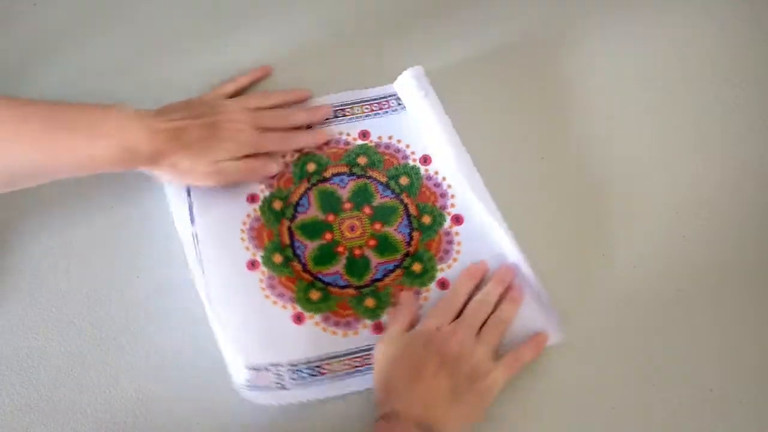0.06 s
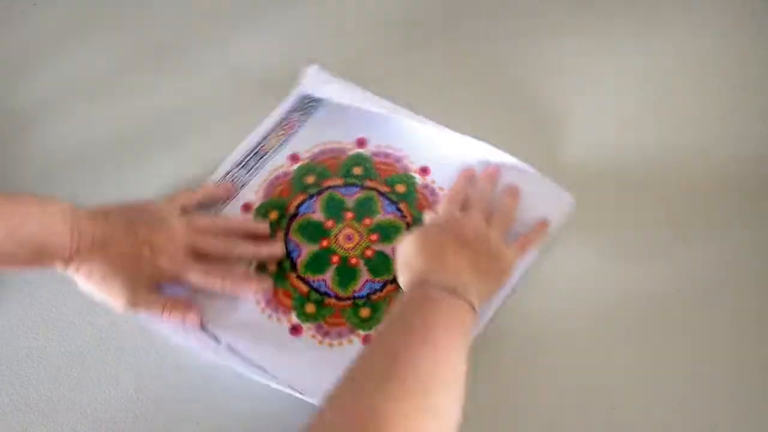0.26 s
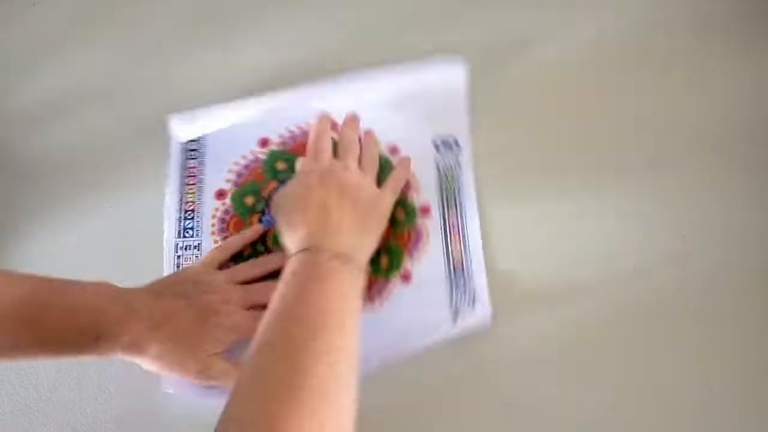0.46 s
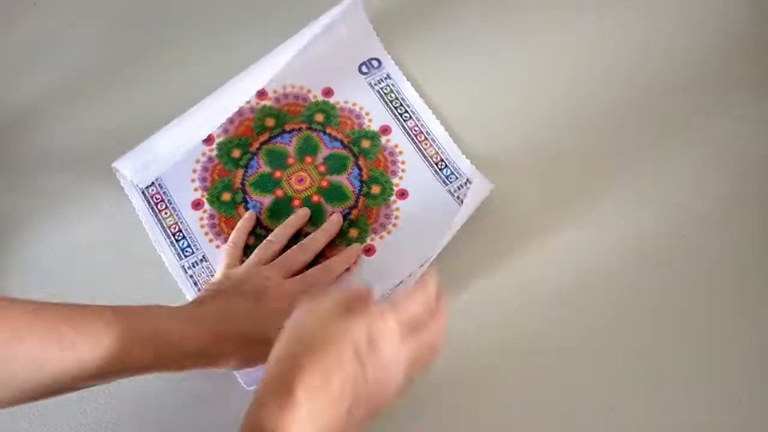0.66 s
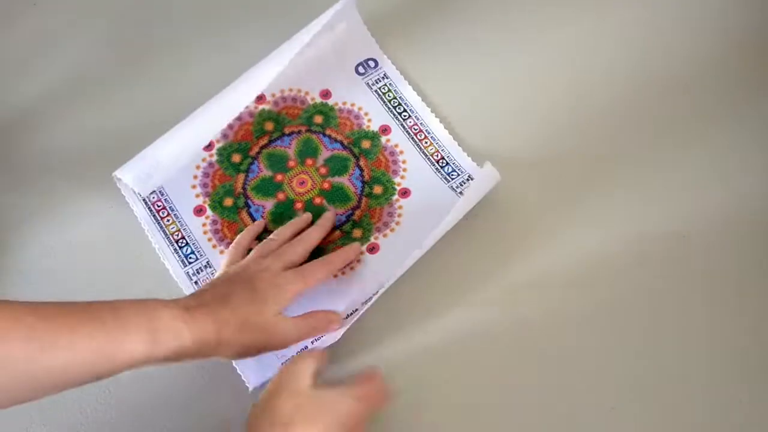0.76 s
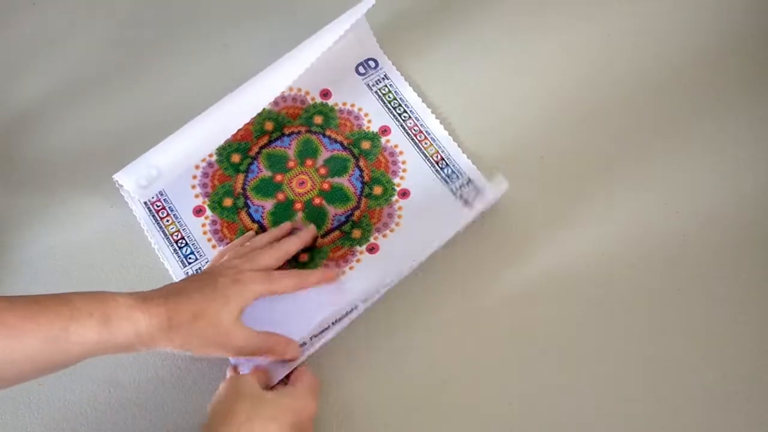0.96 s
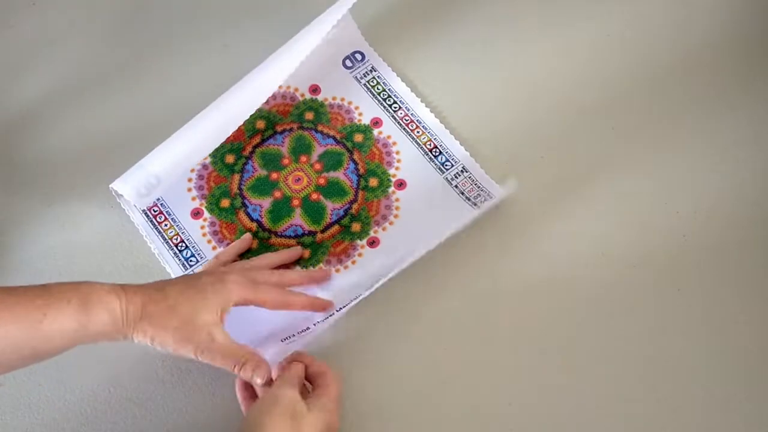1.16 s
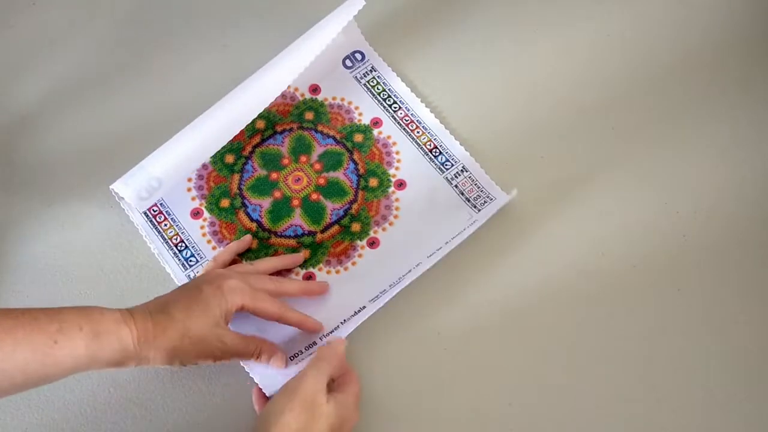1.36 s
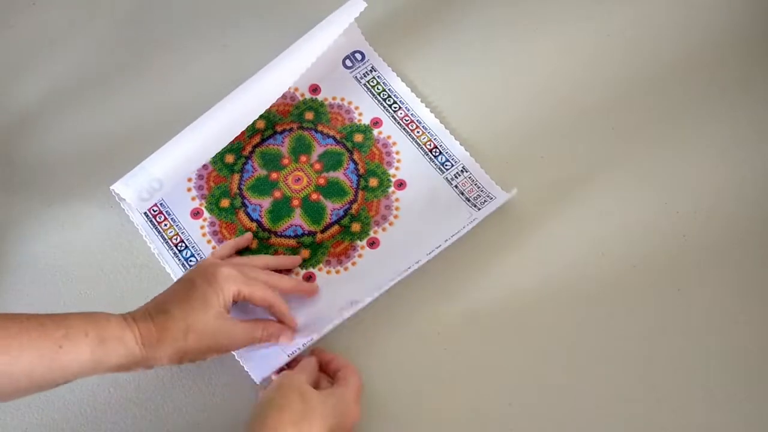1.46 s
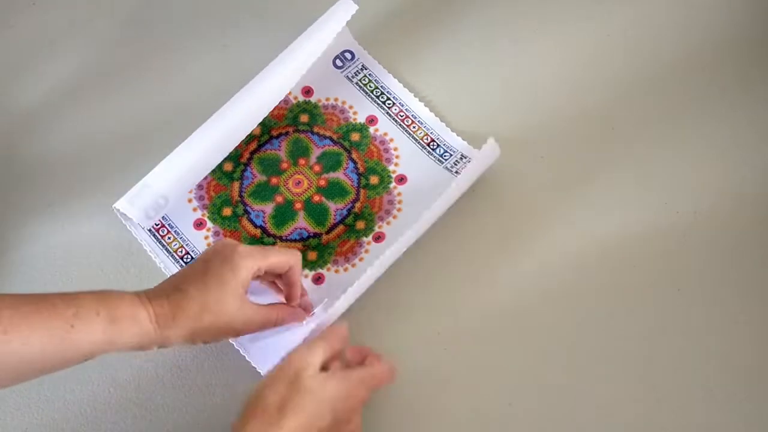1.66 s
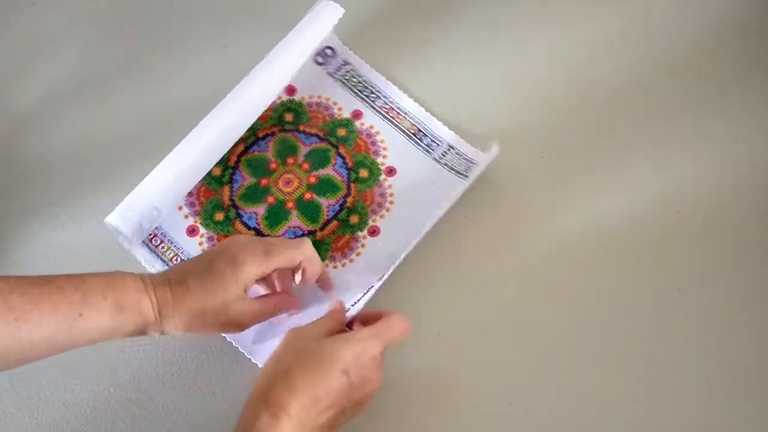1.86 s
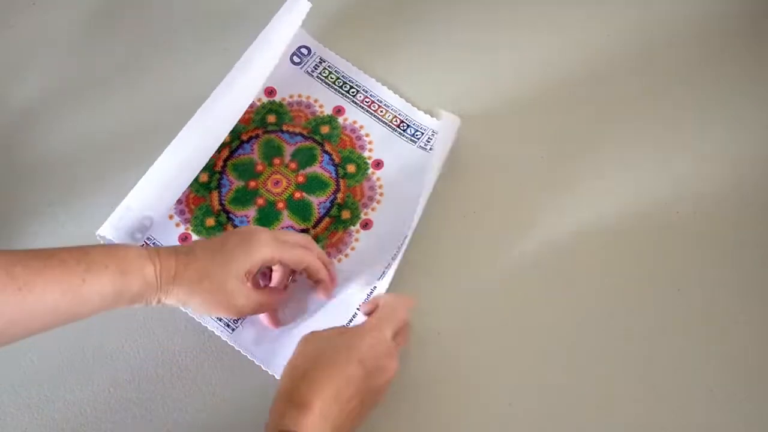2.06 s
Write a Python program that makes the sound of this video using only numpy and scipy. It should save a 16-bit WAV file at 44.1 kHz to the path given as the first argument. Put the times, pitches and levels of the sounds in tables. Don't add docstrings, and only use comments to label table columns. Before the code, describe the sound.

Film-covered canvas rubs over a tabletop, ends in a dense burst of bright snaps, then gives scattered small crinkles and light taps as a corner is bent and peeled; mono, indoors, low air rumble.

```python
import sys
import numpy as np
from scipy import signal
from scipy.fft import rfft, irfft
from scipy.io import wavfile
from scipy.ndimage import uniform_filter1d

SR = 44100
rng = np.random.default_rng(int(sys.argv[2]) if len(sys.argv) > 2 else 0)


def output_pcm(signal):
    pcm = np.clip(np.atleast_2d(signal).T, -1, 1) * 32767
    wavfile.write(sys.argv[1], SR, np.round(pcm).astype(np.int16))


def makeup_ratio(level_db):
    decades = np.asarray(level_db, float) / 20
    return 10 ** decades


N = 94815


def unit(x):
    return x / np.sqrt(np.mean(x ** 2))


def shape(x, gain_db):
    cepstrum = irfft(gain_db * np.log(10) / 20)
    half = len(cepstrum) // 2
    cepstrum[1:half] *= 2
    cepstrum[half + 1:] = 0
    return signal.fftconvolve(x, irfft(np.exp(rfft(cepstrum))))[:N]


def colour(x, table):
    bin_hz = np.maximum(np.linspace(0, SR / 2, 2049), 1)
    points = np.array(table, float)
    return shape(x, np.interp(np.log(bin_hz), np.log(points[:, 0]), points[:, 1]))


def curve(table):
    points = np.array(table, float)
    level_db = np.interp(np.arange(N) / SR, points[:, 0], points[:, 1], left=-120, right=-120)
    return makeup_ratio(level_db)


def walk(rate_hz):
    width = int(SR / rate_hz)
    return unit(uniform_filter1d(uniform_filter1d(rng.standard_normal(N), width), width))


def decay(t_s, t60_s):
    return np.exp(-np.log(1000) * t_s / t60_s)


def clicks(rate_per_s, spread_db):
    hit = rng.random(N) < rate_per_s / SR
    size = makeup_ratio(spread_db * np.minimum(rng.exponential(size=N), 4))
    return unit(hit * np.sign(rng.standard_normal(N)) * size)


def crackle():
    return clicks(5000, 3) + 1.01 * rng.standard_normal(N)


def burst(start_s, length_ms):
    attack_ms = 0.89
    since_ms = np.maximum(np.arange(N) / SR - start_s, 0) * 1000
    return (1 - np.exp(-since_ms / attack_ms)) * np.exp(-(since_ms / max(length_ms, .3)) ** 2)


def film(bright, body, fizz):
    # [Hz, dB]
    skin_gain = [(800, -26), (2000, -11), (3500, -0.5), (5000, 0), (8000, -2), (11000, 0.5), (12500, -4),
                 (16000, -34.5)]
    # [Hz, dB]
    body_gain = [(300, -43), (800, -5.5), (1500, -1), (2500, 0), (4000, -9), (7000, -20.5)]
    # [Hz, dB]
    fizz_gain = [(8000, -16), (11000, -53), (12500, -3.5), (16000, 0.5)]
    return colour(bright, skin_gain) + colour(body, body_gain) + colour(fizz, fizz_gain)


def snaps():
    # start_s, peak_db, body_share_db, length_ms, fizz_share_db
    film_snaps = [(0.455, -19.5, -9, 2.9, 1), (0.465, -26.5, -10, 4.5, -3), (0.5067, -25, -18, 3.5, 5),
                  (0.5107, -23.5, -25, 2.8, 0), (0.5272, -27.5, -23, 11.5, -2), (0.5495, -24, -30, 2.7, -8),
                  (0.5543, -21.5, -28, 5.8, -11), (0.5747, -18, -20, 6.9, -1), (0.581, -12.5, -10, 3.43, 0),
                  (0.586, -27.5, -20, 5, 6), (0.5919, -20.5, -13.5, 5.7, 2.5), (0.601, -30, -20, 3, 1),
                  (0.6194, -35, -5, 13, -3), (0.69, -34.5, -0.5, 7.2, -10), (0.764, -35, 0.5, 5.1, 2),
                  (0.822, -42, -14, 6, -4), (0.847, -31.5, -3.5, 4.1, -2), (0.854, -37.5, -7, 3, 7),
                  (0.9144, -62, 21.5, 6.9, -9), (0.9458, -48, 12.5, 3.4, -7), (0.955, -48, -6, 12, 3),
                  (1.012, -49, -19, 5.9, 11), (1.022, -41, -14, 8.4, 7), (1.086, -40.5, -1.5, 10, 3),
                  (1.1138, -30, 0, 4.7, 1.5), (1.141, -34.5, 0.5, 6.8, -2), (1.1816, -33.5, -14, 2.3, 3.5),
                  (1.2274, -47, -1, 3.6, 4), (1.2394, -32, -4, 4.5, 0), (1.2616, -36, -20, 3.2, 11),
                  (1.2805, -42, -15, 3.6, -4), (1.291, -31, -10, 5, 5), (1.298, -25.5, -13.5, 9.5, 6),
                  (1.3092, -26, -12.5, 3.6, -12), (1.3424, -37, -7, 2.9, -7), (1.415, -46, 3, 9.8, -10),
                  (1.559, -47, -7, 7.3, -4), (1.58, -40, -0.5, 10.7, 1.5), (1.613, -25.5, -3, 3.9, 0.5),
                  (1.6374, -66, 0, 2.2, 0), (1.6593, -30, -7, 3.2, 9), (1.664, -32, -6, 2.7, 6),
                  (1.7342, -37.5, -3.5, 5.6, 2), (1.7721, -34, -6.5, 5.9, -3.5),
                  (1.8073, -37.5, -28, 7.1, -9), (1.8193, -32, -5, 5.5, 3), (1.849, -34, -5, 2.5, 4),
                  (1.8518, -35, -1, 4.6, 4), (1.862, -42, -4, 4.9, 4), (1.941, -45.5, 3, 9, -2),
                  (1.9535, -38.5, 4.5, 6.7, 5), (2.003, -37.5, 2.5, 4.6, -6), (2.0066, -34.5, -10, 6.4, -4),
                  (2.065, -43, 0, 10.4, -11), (2.0764, -29, -10, 4.4, -4), (2.082, -33.5, -5, 14, 2),
                  (2.112, -41, 2, 5.2, -2), (2.1295, -32.5, -2, 4.4, 2.5)]
    snap_db, body_db, fizz_db = -11.5, 5, -1
    echo_ms, echo_db, settle_ms, settle_db = 6.9, -9, 20, -20
    t = np.arange(N) / SR
    grain = crackle()
    parts = np.zeros((3, N))
    for start_s, peak_db, body_share_db, length_ms, fizz_share_db in film_snaps:
        env = burst(start_s, length_ms)
        env = env + makeup_ratio(echo_db) * burst(start_s + echo_ms / 1000, length_ms)
        env = env + makeup_ratio(settle_db) * (t > start_s) * np.exp(-np.abs(t - start_s) * 1000 / settle_ms)
        pop = env * grain
        pop = pop * np.sqrt(np.sum(env ** 2) / np.sum(pop ** 2))
        shares_db = np.array([[0], [body_share_db + body_db], [fizz_share_db + fizz_db]])
        parts += pop * makeup_ratio(peak_db + snap_db + shares_db)
    return film(*parts)


def ticks():
    # start_s, peak_db
    flips = [(.527, -21), (.5955, -17), (.767, -33), (.8485, -36), (1.1148, -31), (1.1833, -36),
             (1.2405, -33), (1.262, -32), (1.281, -37), (1.295, -32), (1.303, -21), (1.614, -31),
             (1.66, -33), (1.954, -34), (2.01, -35), (2.13, -35)]
    click = np.zeros(N)
    for start_s, peak_db in flips:
        click[int(start_s * SR)] = makeup_ratio(peak_db)
    tick = film(click, click * 0.14, click)
    return tick * click.max() / np.abs(tick).max()


def panel_rings():
    # start_s, peak_db, pitch_hz, t60_s
    panels = [(.15, -55, 670, 0.14), (.222, -43.5, 975, 0.073), (.235, -47, 672, 0.075),
              (.3, -47, 688, 0.076), (.45, -43, 1123, .06), (0.583, -27.5, 3400, 0.011),
              (.59, -47, 37.8, .15), (0.692, -46.5, 45.3, 0.19), (.549, -20, 8340, 0.0033),
              (0.555, -27, 7580, 0.0082), (0.913, -52, 1168, 0.097), (.913, -45.5, 221, 0.098),
              (.962, -46.5, 340.8, 0.29), (1.056, -50, 130, 0.12), (1.145, -44, 1396, .029),
              (1.186, -52.5, 133, 0.19), (1.254, -54.5, 126, 0.11), (1.42, -55, 194, 0.09),
              (1.446, -48, 149, 0.087), (1.613, -37.5, 1700, 0.027), (1.66, -48, 2640, .029),
              (1.852, -47, 2260, 0.021), (2.1, -54, 213, .1)]
    rise_cycles = 1.6
    t, out = np.arange(N) / SR, 0
    for start_s, peak_db, pitch_hz, t60_s in panels:
        since_s = np.maximum(t - start_s, 0)
        rise = 1 - np.exp(-since_s * pitch_hz / rise_cycles)
        tone = np.sin(2 * np.pi * pitch_hz * since_s)
        out = out + makeup_ratio(peak_db) * tone * decay(since_s, t60_s) * rise
    return out


def rustle():
    # time_s, level_db
    handling = [(.7, -87), (.8, -59.5), (.9, -69.5), (1.05, -63.5), (1.15, -58.5), (1.25, -55),
                (1.32, -45.5), (1.38, -61.5), (1.45, -68.5), (1.54, -76), (1.63, -56), (1.72, -62),
                (1.84, -70), (1.91, -66), (2.0, -56.5), (2.05, -62.5), (2.1, -52.5), (2.16, -58)]
    rate_per_s, spread_db, fade_ms, level_db = 250, 2, 5.4, -6
    body_db, fizz_db = 1.5, -4.5
    fade = np.exp(-np.arange(2000) / SR * 1000 / fade_ms)
    env = signal.fftconvolve(np.abs(clicks(rate_per_s, spread_db)), fade)[:N]
    skin = (unit(env) + 0.44) * curve(handling) * makeup_ratio(level_db) * crackle()
    body = skin * makeup_ratio(body_db + 1.5 * walk(15))
    fizz = skin * makeup_ratio(fizz_db + 1.5 * walk(15))
    return film(skin, body, fizz)


def slide():
    # time_s, level_db, scrape_hz
    motion = [
        (0, -51.5, 600),
        (.1, -43.5, 660),
        (.21, -39, 750),
        (.33, -36, 980),
        (.46, -36, 1120),
        (.56, -38, 1200),
        (.65, -43, 800),
        (.74, -44.5, 700),
        (.86, -79, 650),
    ]
    # [Hz, dB]
    canvas_gain = [(150, -30), (400, -9.5), (700, -1.5), (1100, 2.5), (1500, -0.5), (2500, 1), (6000, 2),
                   (16000, -5)]
    # [Hz, dB]
    rumble_gain = [(20, -12), (120, -4), (250, -9), (500, -11.5), (2000, -60)]
    level_db, scrape_db, scrape_width_hz = -7, -15, 490
    drone_hz, drone_db, rumble_db = 340, -22, -27
    t = np.arange(N) / SR
    speed = curve(motion)

    rub = rng.standard_normal(N) + 0.41 * clicks(1800, 1.5)
    hiss = unit(colour(rub, canvas_gain)) * makeup_ratio(0.76 * walk(22) + 0.28 * walk(140))

    scrape_hz = np.interp(t, np.array(motion)[:, 0], np.array(motion)[:, 2])
    carrier = np.sin(2 * np.pi * np.cumsum(scrape_hz) / SR)
    scrape = walk(scrape_width_hz) * carrier * makeup_ratio(scrape_db + 5.2 * walk(31))

    hum = walk(35) * np.sin(2 * np.pi * drone_hz * t) * makeup_ratio(drone_db)
    hum = hum + unit(colour(rng.standard_normal(N), rumble_gain)) * makeup_ratio(rumble_db)
    return (hiss + scrape) * makeup_ratio(level_db) * speed + hum * speed ** 0.33 * makeup_ratio(-30)


def knocks():
    # start_s, peak_db, tilt_db_per_octave (away from the hollow note), contact_ms
    touches = [
        (.911, -44.5, 0, 3),
        (0.917, -47, 6, 10),
        (0.936, -44, 8, 17),
        (0.946, -53.5, 17, 2.6),
        (0.963, -49.5, 5, 8.5),
        (0.999, -52, -3.5, 34),
        (1.415, -52, 9.5, 1.4),
        (1.421, -45.5, -17, 6.2),
        (1.435, -48, -17, 5.7),
        (2.074, -49, 1, 79),
    ]
    # freq_hz, level_db, t60_s
    modes = [(200, -7, .08), (260, -6, .05), (341, 0, .15), (436, -5, .06), (525, -5, .05), (670, -3, .045),
             (860, -5, .04), (1190, -4, .07)]
    # [Hz, dB]
    skin_gain = [(120, -28), (400, 0), (750, -4), (1200, -8), (2500, -35)]
    hollow_hz, low_cut_hz, thud_db, thud_extra_ms = 340, 167, -6.5, 14
    t, out = np.arange(SR // 2) / SR, np.zeros(N)
    low_cut = signal.butter(2, low_cut_hz, "high", fs=SR, output="sos")
    for start_s, peak_db, tilt_db, contact_ms in touches:
        ring = 0
        for hz, mode_db, t60_s in modes:
            gain = makeup_ratio(mode_db + tilt_db * abs(np.log2(hz / hollow_hz)))
            ring = ring + gain * np.sin(2 * np.pi * hz * t) * decay(t, t60_s)
        scuff = burst(start_s, contact_ms) * rng.standard_normal(N)
        thud = colour(burst(start_s, contact_ms + thud_extra_ms) * rng.standard_normal(N), skin_gain)
        hit = signal.sosfilt(low_cut, signal.fftconvolve(scuff, ring)[:N])
        hit = hit / np.abs(hit).max() + makeup_ratio(thud_db + tilt_db) * thud / np.abs(thud).max()
        out += makeup_ratio(peak_db) * hit / np.abs(hit).max()
    return out


def room(x, count=16):
    t60_s, level_db, rise_s = 0.22, -8.5, 0.00052
    t, out = np.arange(SR // 2) / SR, 0
    fade = decay(t, t60_s) * (1 - np.exp(-t / rise_s))
    position = np.arange(N) / N * (count - 1)
    for k in range(count):
        tail = rng.standard_normal(len(t)) * fade / np.sqrt(np.sum(fade ** 2)) * makeup_ratio(level_db)
        part = np.sqrt(np.clip(1 - np.abs(position - k), 0, 1))
        out = out + signal.fftconvolve(x * part, tail)[:N]
    return out


def air():
    # [Hz, dB]
    air_gain = [(3, 11), (15, -1), (30, -6.5), (150, -13.5), (340, -16), (800, -18), (2500, -25),
                (16000, -34.5)]
    # time_s, level_db
    hush = [(0, 2), (.8, -0.5), (.89, 0), (1.0, -1.5), (1.38, 2), (1.47, -2), (1.55, -3), (1.64, -2.5),
            (1.8, -1.5), (1.95, 0.5), (2.16, 3.5)]
    tone = unit(colour(rng.standard_normal(N), air_gain))
    return tone * curve(hush) * makeup_ratio(-58 + 1.2 * walk(6))


def scene():
    sheet = snaps() + ticks() + panel_rings() + rustle() + slide()
    table = knocks()
    mono = sheet + table + room(sheet + 0.68 * table) + air()
    return np.array([mono, mono])


def band_limit(x):
    return signal.sosfilt(signal.butter(12, 16970, fs=SR, output="sos"), x)


def record(dry):
    # center_hz, width_hz, peak_db
    mic_peaks = [(2820, 1640, 9), (7604, 1740, 10), (14300, 3330, 15.5), (4780, 1260, -2)]
    bin_hz = np.linspace(0, SR / 2, 2049)
    gain_db = sum(db / (1 + (2 * (bin_hz - hz) / width_hz) ** 2) for hz, width_hz, db in mic_peaks)
    top_cut = signal.ellip(8, .3, 32, 15950, fs=SR, output="sos")
    mono = signal.sosfilt(top_cut, shape(dry[0], gain_db))
    return band_limit(np.array([mono, mono]))


dry = scene()
out = record(dry)
output_pcm(out)
```